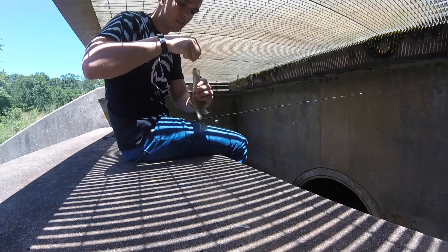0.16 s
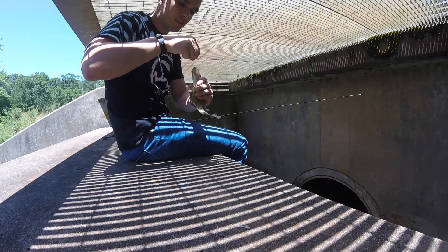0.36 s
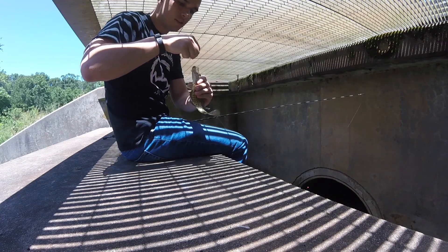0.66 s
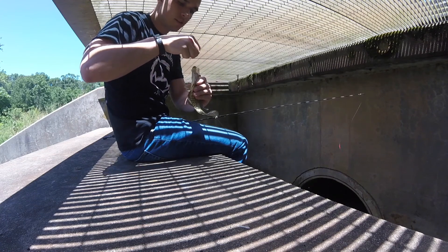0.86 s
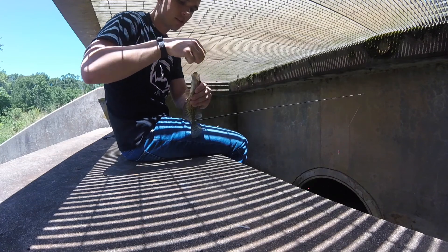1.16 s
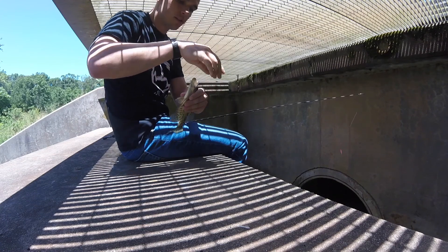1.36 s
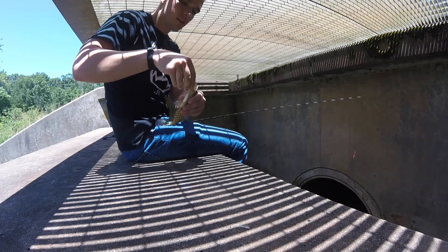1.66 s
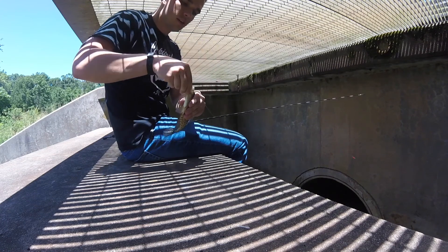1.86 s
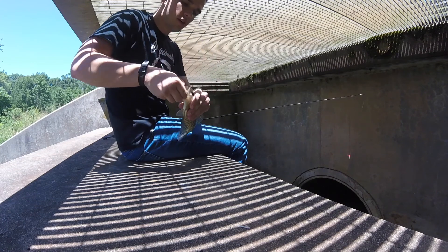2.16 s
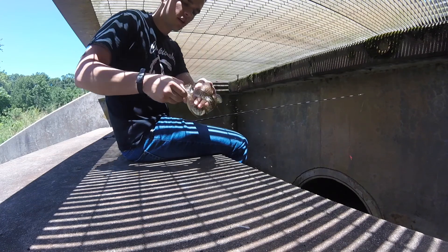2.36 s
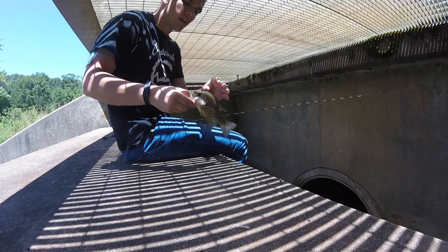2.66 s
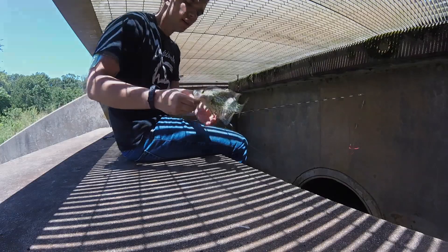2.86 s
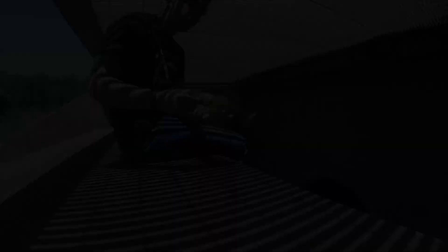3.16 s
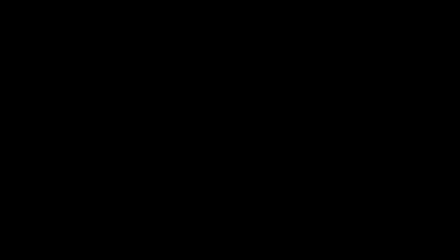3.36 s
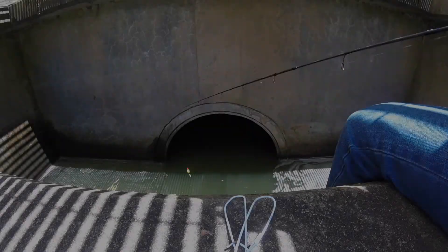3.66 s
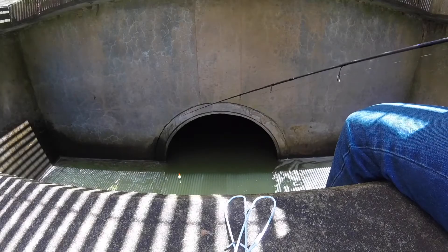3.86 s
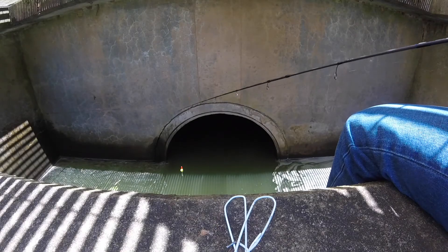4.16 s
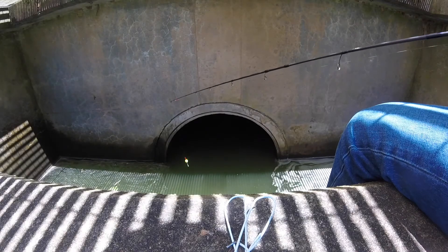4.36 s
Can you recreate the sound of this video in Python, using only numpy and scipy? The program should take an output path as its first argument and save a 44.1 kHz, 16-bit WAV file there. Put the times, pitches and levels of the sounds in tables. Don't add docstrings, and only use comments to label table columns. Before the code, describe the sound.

A dark, boomy rush of falling water churns inside a concrete chamber, dipping slightly midway before returning a little closer and fuller.

```python
import sys
import numpy as np
from scipy import signal
from scipy.fft import rfft, irfft, dct, next_fast_len
from scipy.io import wavfile
from scipy.ndimage import uniform_filter1d

SR = 44100
rng = np.random.default_rng(int(sys.argv[2]) if len(sys.argv) > 2 else 0)


def level_to_linear(level):
    exponent = np.asarray(level, float) / 20
    return 10 ** exponent


def dump(signal):
    limited = np.clip(np.atleast_2d(signal).T, -1, 1)
    pcm = np.round(limited * 32767).astype(np.int16)
    wavfile.write(sys.argv[1], SR, pcm)


N = 199552


def level(x):
    return x / np.sqrt(np.mean(x ** 2))


def walk(rate_hz):
    held = np.repeat(rng.standard_normal(int(N / SR * rate_hz) + 2), 16)
    slewed = uniform_filter1d(uniform_filter1d(held, size=16), size=16)
    return level(np.interp(np.arange(N) * 16 * rate_hz / SR, np.arange(len(held)), slewed))


def bumps(times, heights, lengths):
    t = np.arange(0, N, 64) / SR
    bells = np.exp(-(2 * (t[:, None] - times) / lengths) ** 2)
    return np.interp(np.arange(N) / SR, t, bells @ heights)


def swelling(steady, rows):
    times, peak_db, lengths = np.transpose(rows)
    return np.sqrt(steady ** 2 + bumps(times, level_to_linear(peak_db) ** 2, lengths))


def standing(pitch_hz, wander, rate_hz):
    pitch = pitch_hz * (1 + wander * walk(rate_hz))
    return np.sqrt(2) * np.sin(2 * np.pi * np.cumsum(pitch) / SR)


def churn(spectrum, modes, flicker_db, rate_hz):
    size = next_fast_len(N)
    hz = np.arange(size // 2 + 1) * SR / size + 1e-3
    points = np.array(spectrum)
    power = level_to_linear(np.interp(np.log(hz), np.log(points[:, 0]), points[:, 1], -200, -200)) ** 2
    rings = sum(level_to_linear(db) ** 2 / (1 + (2 * (hz - f) / width) ** 2) ** 2 for f, width, db in modes)
    noise = rfft(rng.standard_normal(size)) * np.sqrt(power * (1 + rings))
    lowest = np.round(2 * np.log2(points[0, 0])) - 1
    highest = 2 * np.log2(points[-1, 0]) + 1
    out = 0
    for centre in np.arange(lowest, highest):
        share = np.clip(1 - abs(2 * np.log2(hz) - centre), 0, 1)
        out = out + level_to_linear(flicker_db * walk(rate_hz)) * irfft(noise * share, size)[:N]
    return level(out)


def even(x, span_s):
    k = int(span_s * SR)
    return x / np.sqrt(uniform_filter1d(uniform_filter1d(x ** 2, k), k))


def nearness():
    start_s, end_s = 2.93, 3.75
    return np.clip((np.arange(N) / SR - start_s) / (end_s - start_s), 0, 1)


def heard(ledge_db, mouth_db):
    fade = nearness()
    return np.hypot((1 - fade) * level_to_linear(ledge_db), fade * level_to_linear(mouth_db))


def between_spots(ledge, mouth):
    fade = nearness()
    return ((1 - fade) * ledge + fade * mouth) / np.hypot(1 - fade, fade)


# peak_s, level_db (over the deep roar)
SLUGS = [(0, -0.5), (.57, 2.5), (.95, 0.5), (1.85, 1), (2.04, 4), (2.18, 2), (2.57, 2), (2.68, 2.5),
         (2.87, 2.5), (3.21, 5), (3.65, 2), (3.76, 5), (3.99, 1), (4.09, 2.5), (4.23, 1.5), (4.33, 2.5)]


def slug_swell_db():
    return bumps(*np.transpose(SLUGS), 0.08)


# peak_s, level_db (over the roar)
SHEETS = [(.52, 1.5), (.9, 1.5), (1.88, 0.5), (2.1, 1), (2.44, 1), (2.57, 2), (2.94, 2), (3.78, 1),
          (3.89, 0.5), (4.13, 1), (4.45, 2)]


def sheet_swell_db():
    return bumps(*np.transpose(SHEETS), 0.096)


# pitch_hz, level_db (per Hz)
ROAR_LEDGE = [(18, -32), (30, -11), (49, -22.5), (81, -10.5), (245, -10), (297, -15), (353, -10),
              (392, -16), (855, -12.5), (1410, -39), (1900, -52.5), (2470, -71), (4180, -120)]
ROAR_MOUTH = [(18, -26), (30, -10), (48, -21), (81, -8), (156, -11.5), (202, -4.5), (241, -11.5),
              (442, -14.5), (901, -14), (1190, -31), (1900, -51.5), (2470, -75), (4180, -120)]
# pitch_hz, width_hz, level_db (over the roar)
MODES_LEDGE = [(41, 17, 8.5), (94, 14.5, 5.5), (110, 15, 2), (139, 10, 6), (181, 13, 3.5), (218.2, 23, 3.5),
               (242, 6.4, 6.5), (276.5, 22, 3.5), (344.4, 23, 3), (430, 87, -0.5), (493.3, 41, 5),
               (566, 41, -0.5), (850, 14, -1), (1078, 280, -2)]
MODES_MOUTH = [(41.2, 12, 6), (107.6, 18, 3.6), (128.5, 19, 7.8), (193, 7.8, 6.1), (216, 8.9, 9.2),
               (267, 25, 3.9), (352.3, 15, 6.4), (472, 12, 2), (537, 10, 1.6), (780, 20, 1.9),
               (829, 19, 1.5), (934, 22, 1.9), (1123, 33, 1.5)]


def roar(slug_db, sheet_db):
    ledge = churn(ROAR_LEDGE, MODES_LEDGE, flicker_db=0.44, rate_hz=9.2)
    mouth = churn(ROAR_MOUTH, MODES_MOUTH, flicker_db=0.87, rate_hz=9)
    water = between_spots(ledge, mouth)
    body_hz = 300
    deep = signal.sosfiltfilt(signal.butter(2, body_hz, fs=SR, output="sos"), water)
    thuds = heard(-33, -31.5) * level_to_linear(slug_db) * even(deep, span_s=0.04)
    froth = heard(-32.5, -31) * level_to_linear(sheet_db) * even(water - deep, span_s=0.08)
    return thuds + froth


# peak_s, peak_db, length_s
SURGES = [(0, -30, 0.07), (.3, -30.5, .18), (.58, -29.5, 0.19), (0.764, -30, 0.17), (0.914, -25, .12),
          (1.197, -31, .3), (1.55, -31.5, .3), (1.84, -30, .2), (2.026, -26.5, .14), (2.5, -31.5, 0.39),
          (2.765, -28.5, .2), (3.0, -31, 0.099), (3.2, -40, .1), (3.57, -34, .15), (3.867, -27, 0.23),
          (4.065, -30, .1), (4.26, -33.5, .12), (4.47, -23, 0.16)]


def throb():
    return swelling(heard(-46.5, -43), SURGES) * standing(23, wander=.05, rate_hz=5.07)


# peak_s, peak_db, length_s
GULPS = [(0, -28, 0.072), (0.442, -33.5, 0.071), (0.623, -33, 0.15), (0.797, -34.5, 0.17),
         (1.06, -37.5, 0.13), (1.3, -41, .3), (1.79, -35.5, .14), (1.977, -34, 0.055), (2.11, -41, .05),
         (2.45, -45, 0.23), (2.868, -33, .06), (3.057, -38.5, 0.13), (3.24, -35, 0.21),
         (3.543, -30.5, 0.082), (3.903, -28, .1), (4.073, -29.5, 0.085), (4.23, -32.5, .08),
         (4.402, -30.5, 0.11), (4.52, -31, 0.087)]


def hum():
    tone = standing(72.3, wander=.03, rate_hz=12) * level_to_linear(1.0 * walk(20))
    return swelling(heard(-50.5, -40.5), GULPS) * tone


# pitch_hz, level_db (against the spray)
FAINTEST = [(5000, -27), (7000, -12), (8000, -5.5), (10000, -5), (11500, -6), (12500, -7.5), (12900, -3),
            (14000, 3)]


def patchy_treble(x, coarser_db, scatter_db=1.8, hop=1024, band=16):
    h, frames = hop // 2, N // hop + 2
    window = np.sin(np.pi * (np.arange(2 * hop) + .5) / (2 * hop))
    padded = np.pad(x, (hop, (frames + 1) * hop - N - hop))
    places = hop * np.arange(frames)[:, None] + np.arange(2 * hop)
    a, b, c, d = np.split(padded[places] * window, 4, axis=1)
    values = dct(np.hstack([-c[:, ::-1] - d, a - b[:, ::-1]]), type=4, norm="ortho")
    hz = (np.arange(hop) + .5) * SR / (2 * hop)
    step_db = np.interp(hz, *np.transpose(FAINTEST))
    scatter = scatter_db * np.repeat(rng.standard_normal((frames, hop // band)), band, axis=1)
    step = level_to_linear(step_db + coarser_db + scatter)
    values = np.sign(values) * np.floor(abs(values) / step + .4) * step
    p, q = np.split(dct(values, type=4, norm="ortho"), 2, axis=1)
    pieces = np.hstack([q, -q[:, ::-1], -p[:, ::-1], -p]) * window
    return (pieces[:-1, hop:] + pieces[1:, :hop]).ravel()[:N]


# pitch_hz, level_db (per Hz)
SPRAY_LEDGE = [(940, -37), (1600, -13.5), (1830, -9.5), (2200, -0.5), (2470, 0), (2770, -6.5), (3330, -3),
               (3800, -4.5), (4340, -12), (6690, -8.5), (7910, -23), (8720, -23.5), (11100, -23.5),
               (12500, -28.5), (13200, -29)]
SPRAY_MOUTH = [(880, -32), (1500, -1.5), (1650, -8), (2020, -4.5), (2820, -4), (3130, -5.5), (4080, -8),
               (4860, -16.5), (6050, -10.5), (7530, -19.5), (8820, -27.5), (11600, -29), (12200, -47),
               (15900, -75), (22000, -120)]
# pitch_hz, width_hz, level_db (over the spray)
HOUSING = [(7440, 400, -4.5), (8670, 530, 2), (10240, 900, 1.5)]


def spray(slug_db, sheet_db):
    ledge = patchy_treble(churn(SPRAY_LEDGE, HOUSING, flicker_db=1., rate_hz=8), coarser_db=.7)
    mouth = patchy_treble(churn(SPRAY_MOUTH, [], flicker_db=.8, rate_hz=8), coarser_db=-1.5)
    follows = 0.19
    return heard(-52.7, -52.5) * level_to_linear(follows * (slug_db + sheet_db)) * between_spots(ledge, mouth)


def scene():
    slug_db, sheet_db = slug_swell_db(), sheet_swell_db()
    mix = roar(slug_db, sheet_db) + throb() + hum() + spray(slug_db, sheet_db)
    return mix[None]


def low_pass(x):
    return signal.sosfilt(signal.butter(12, 13360, fs=SR, output="sos"), x)


def record(dry):
    ending = np.clip((N - np.arange(N)) / (.002 * SR), 0, 1)
    return low_pass(ending * dry)


dry = scene()
out = record(dry)
dump(out)
```